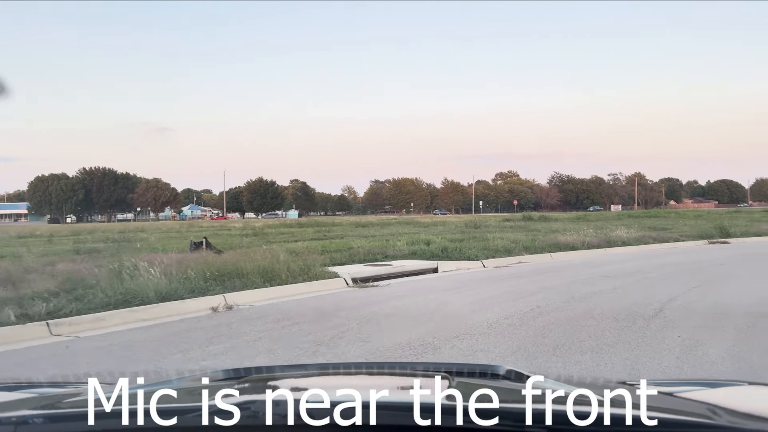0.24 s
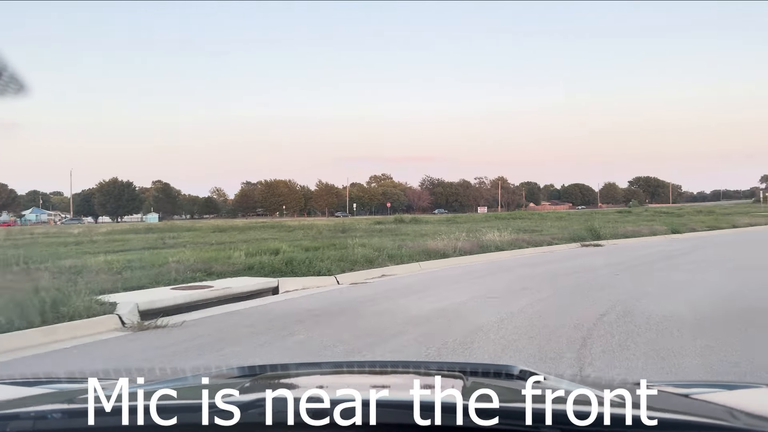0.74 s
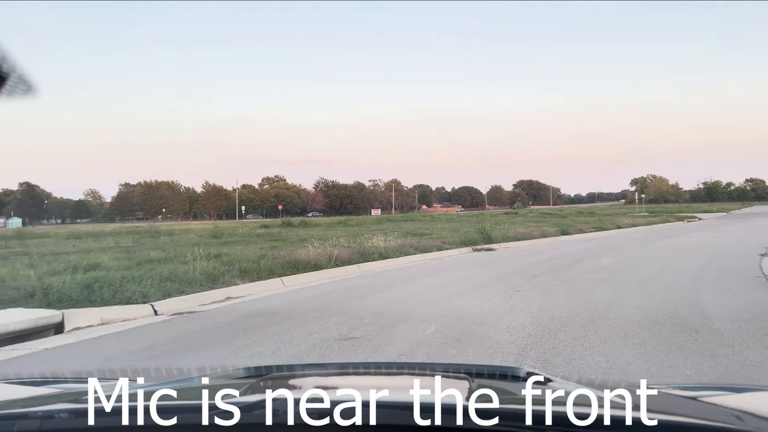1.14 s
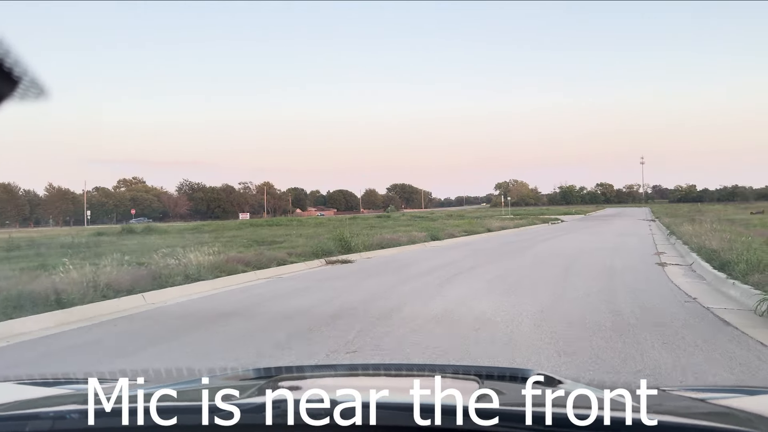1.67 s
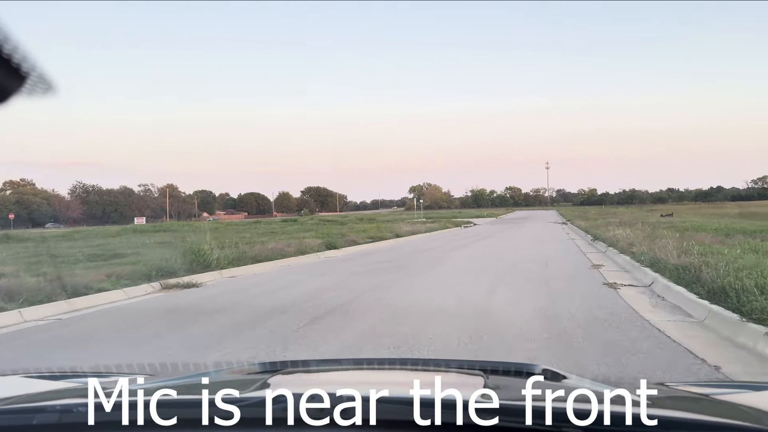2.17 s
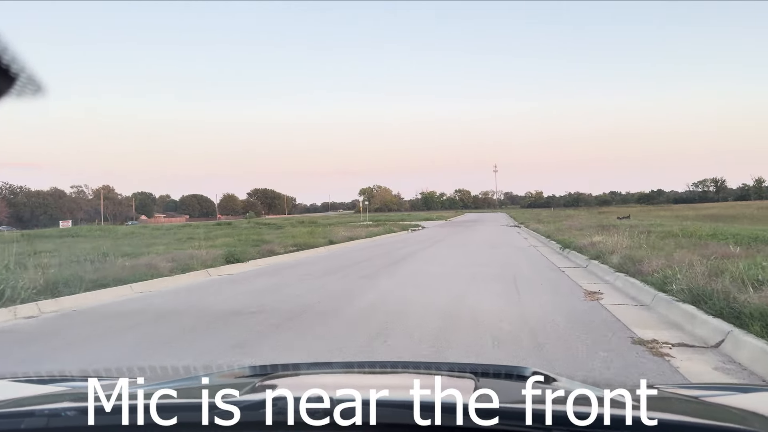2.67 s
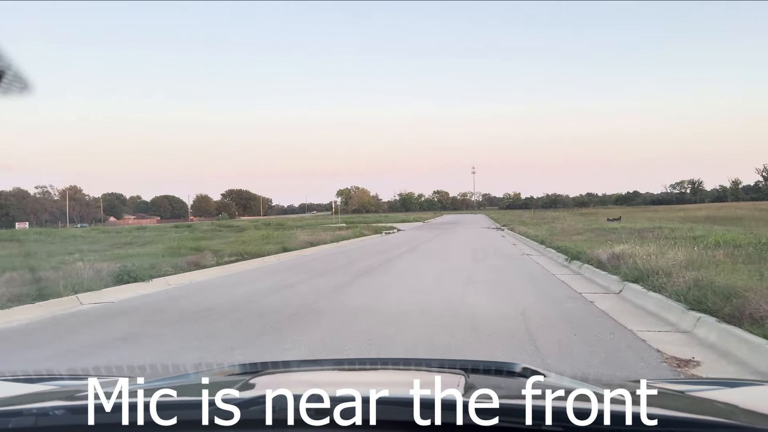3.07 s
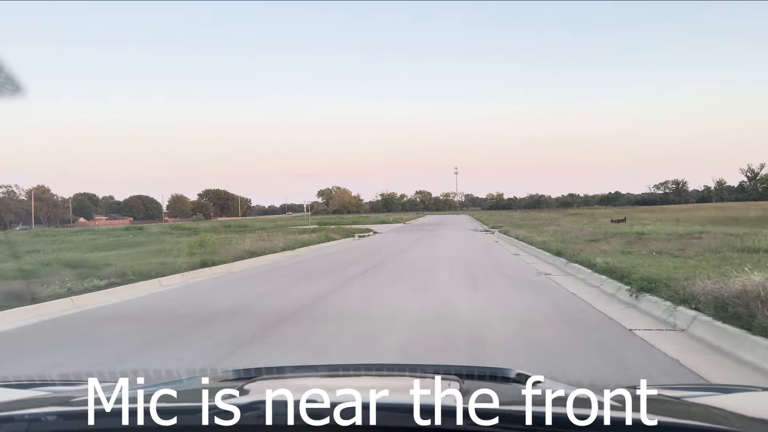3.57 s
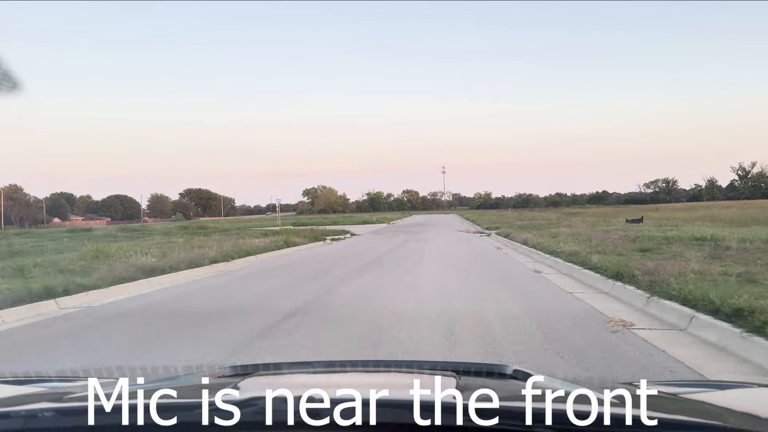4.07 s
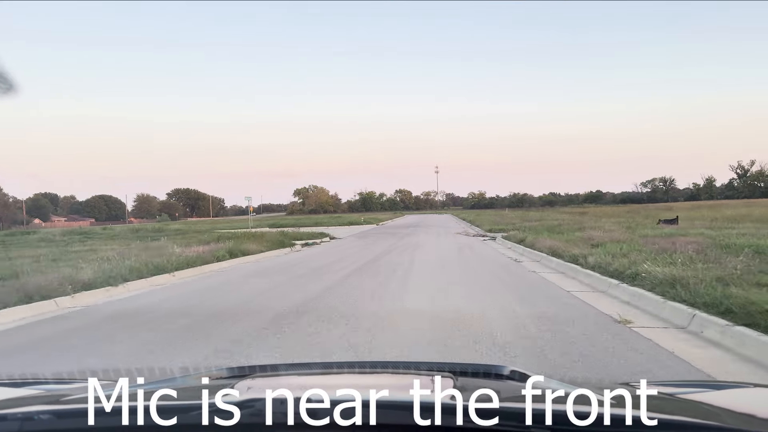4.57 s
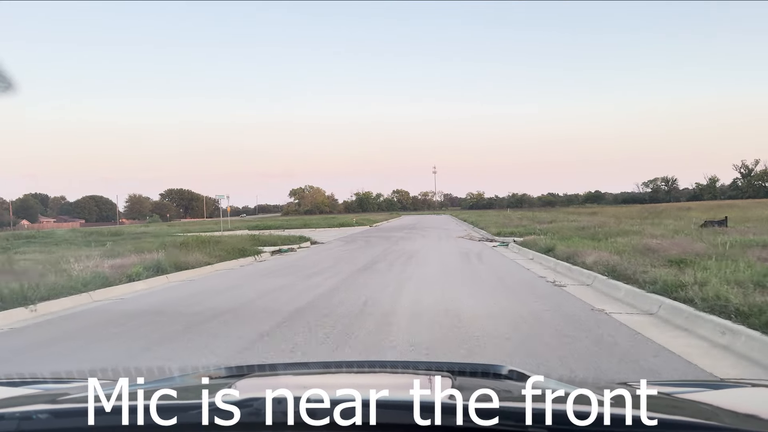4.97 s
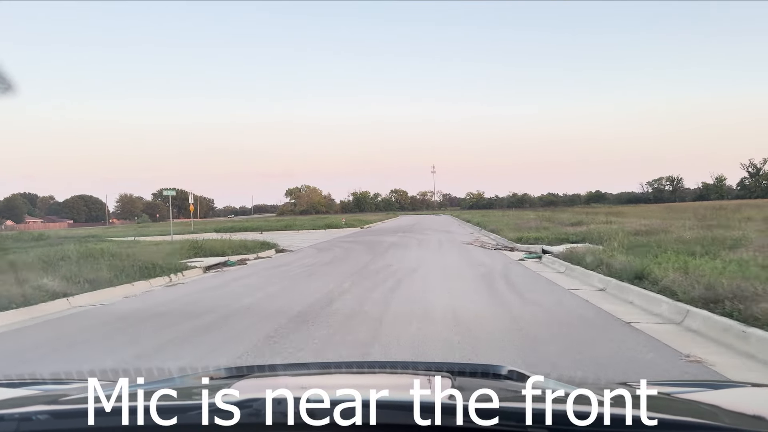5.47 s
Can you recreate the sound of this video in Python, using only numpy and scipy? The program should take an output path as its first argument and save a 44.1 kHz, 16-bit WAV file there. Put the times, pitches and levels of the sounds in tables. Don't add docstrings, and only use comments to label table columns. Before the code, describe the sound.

A car accelerates on a quiet road, heard from a microphone near the front. The low buzzing drone climbs and grows louder and rougher, then drops away into about ten chuffing turbo flutters with uneven exhaust stumbles. A short metallic clack marks the shift, the note dips, and the boom returns, rising with intake hiss to the end. Dry, close mono sound with distorted bass.

```python
import sys
import numpy as np
from scipy import signal
from scipy.fft import rfft, irfft
from scipy.io import wavfile

SR = 44100
rng = np.random.default_rng(int(sys.argv[2]) if len(sys.argv) > 2 else 0)


def unload_audio(sound):
    columns = np.transpose(np.atleast_2d(sound))
    steps = np.round(np.clip(columns, -1, 1) * 32767)
    wavfile.write(sys.argv[1], SR, steps.astype(np.int16))


def attenuation_scalar(level_db):
    decades = np.asarray(level_db, float) / 20
    return 10 ** decades


N = 252693
T = np.arange(N) / SR

PULSE_LAG = [0, -2.2, 2.9, 1.0, -1.5]
# f/Hz, width/Hz, lift/dB
PANEL_RINGS = [(458, 9.8, 0.5), (926, 340, 3), (1320, 11, 5), (1713, 80, 6.5), (2000, 78, -4),
               (2214, 100, 4), (2274, 32, 5), (2552, 100, 9), (2870, 27, 6), (3170, 22, 9.5),
               (3480, 52, 6.5), (3620, 10, -8), (4300, 220, 5), (4750, 190, 3.5), (4760, 99, 5),
               (4930, 160, -23), (5570, 68, 6), (5420, 80, -19), (5700, 80, 8), (6650, 200, 8.5),
               (7510, 150, 9), (7910, 120, 5), (8100, 60, -3), (8830, 87, 9), (9800, 60, 6.5),
               (11070, 150, 1.5), (11540, 100, 4.5), (12500, 80, -5), (14650, 220, 8)]
# f/Hz, width/Hz, lift/dB
DUCT_WHISTLES = [(3700, 49, 15), (3840, 250, 7), (4700, 35, 5.2), (5183, 42, 7.4), (6300, 86, 6),
                 (6760, 110, 5.7), (1775, 28, 8.3), (2450, 136.4, 4.1)]
LIFT_S, PRESS_S = 3.46, 4.49


def evened(x):
    return x / np.sqrt(np.mean(x ** 2) + 1e-20)


def read(points, hz):
    f, value = np.transpose(points)
    return np.interp(np.log(hz + 1), np.log(f + 1), value)


def columns(rows):
    s, *rest = np.transpose(rows)
    return [np.interp(T, s, c) for c in rest]


def drift(rate_hz):
    lowpass = signal.butter(2, rate_hz, fs=SR, output="sos")
    return evened(signal.sosfilt(lowpass, rng.standard_normal(N)))


def ramp(s, length):
    return np.sin(np.pi / 2 * np.clip((T - s) / length, 0, 1)) ** 2


def coloured(x, points, lo_hz, hi_hz, rings=()):
    hz = np.fft.rfftfreq(len(x), 1 / SR)
    lift_db = sum(db / (1 + (2 * (hz - f) / w) ** 2) for f, w, db in rings)
    z = rfft(x) * attenuation_scalar(read(points, hz) + lift_db)
    inside = (hz > lo_hz) & (hz < hi_hz)
    return irfft(z, len(x)) * len(x) / np.sqrt(2 * np.sum(abs(z[inside]) ** 2))


def add(mix, s, sound):
    part = mix[round(s * SR):][:len(sound)]
    part += sound[:len(part)]


def road(db):
    # f/Hz, spectral level/dB
    rumble_colour = [(4, 13.5), (12, 9.5), (30, 0.5), (55, -8.5), (130, -3), (250, -1.5), (330, -18.5),
                     (700, -16.5), (1500, -85), (3000, -110)]
    lumps_db = 1.6 * drift(8)
    return attenuation_scalar(db + 4.0 + lumps_db) * coloured(rng.standard_normal(N), rumble_colour, 19.8, 53.0)


def intake(turns, db, idle_db=-53):
    # f/Hz, spectral level/dB
    rush_colour = [(1500, -63), (3000, -50), (3900, 4.5), (5000, 10), (5700, -1), (6800, 0.5), (8500, -4),
                   (12000, -70), (15700, -41)]
    power = np.maximum(attenuation_scalar(2 * db) - attenuation_scalar(2 * idle_db), 0)
    breath = 1 + 0.27 * np.cos(4 * np.pi * turns + 2.05) + 0.087 * drift(60)
    rush = coloured(rng.standard_normal(N), rush_colour, 3500, 6700, DUCT_WHISTLES)
    return np.sqrt(power) * breath * rush


def clatter(turns, db):
    # f/Hz, spectral level/dB
    metal_colour = [(250, 3.5), (400, -8.5), (500, -11.5), (700, -23.5), (950, -13), (1700, -16.5),
                    (3700, -18), (4800, -19), (5600, -27), (9300, -31), (11600, -32), (12600, -33.5),
                    (13300, -39), (15700, -51)]
    # low f/Hz, high f/Hz, phase/cycle, flare depth, extra on every second firing
    parts = [(250, 1400, .3, 1.6, .3), (1400, 3300, 0, 1.9, .2), (3300, 5600, .85, 1.7, .1),
             (5600, 10300, .9, .8, .1), (10300, 12800, .1, 1.3, .5), (12800, 17000, .1, .4, .1)]
    noise = coloured(rng.standard_normal(N), metal_colour, 1180, 3410, PANEL_RINGS)
    out = 0
    for lo_hz, hi_hz, place, depth, extra in parts:
        firing, since = np.divmod(turns - place + 1, 1)
        size = attenuation_scalar(0.28 * rng.standard_normal(1000))[firing.astype(int)]
        size = size * (1 + extra * (-1) ** firing)
        flare = evened(1 + depth * size * 4 * since * np.exp(1 - 4 * since))
        band = signal.butter(3, [lo_hz, hi_hz], "band", fs=SR, output="sos")
        out = out + flare * signal.sosfiltfilt(band, noise)
    return attenuation_scalar(db - 1.6) * out


def thumps():
    # t/s, peak level/dB, f/Hz
    late_burns = [(3.554, -17, 154), (3.581, -17, 117.3), (3.57, -21, 62), (3.632, -21, 68),
                  (3.669, -14.5, 118.5), (3.701, -22, 61.6), (3.738, -18, 178), (3.802, -23.5, 130),
                  (3.8, -23, 30), (3.98, -29, 35), (4.15, -37, 60.3), (4.21, -37, 137), (4.249, -25, 121),
                  (4.42, -35, 95.1), (4.45, -34, 50)]
    out, t = np.zeros(N), T[:SR // 10]
    for s, db, hz in late_burns:
        swell = (t / 0.022) * np.exp(1 - t / 0.013)
        add(out, s - .015, attenuation_scalar(db) * swell * np.sin(2 * np.pi * hz * t))
    return out


def clacks():
    # t/s, peak level/dB, ring f/Hz, brightness/dB
    strikes = [
        (0.5194, -40, 1650, -13),
        (4.4493, -24.5, 1610, -10),
        (4.7, -27, 1320, -19),
    ]
    modes = [(1, 0), (2.1, -7), (5.2, -17)]
    rattle_colour = [(800, -31), (2500, 11), (9000, -4), (15000, -20)]
    out, t = np.zeros(N), T[:SR // 10]
    for s, db, hz, bright_db in strikes:
        ring, *upper = (attenuation_scalar(d) * np.sin(2 * np.pi * k * hz * t) * np.exp(-t / 0.0026) for k, d in modes)
        rattle = coloured(rng.standard_normal(len(t)), rattle_colour, 800, 15000)
        tick_and_tail = 0.14 * np.exp(-t / 0.0024) + 0.17 * np.exp(-t / 0.036)
        bright = sum(upper) + rattle * tick_and_tail
        onset = np.minimum(t / 0.00081, 1)
        add(out, s, attenuation_scalar(db) * (ring + attenuation_scalar(bright_db + 7) * bright) * onset)
    return out


def flutter():
    # t/s, peak level/dB, duct ring f/Hz
    surges = [(3.462, -19, 1022), (3.539, -21, 1075), (3.622, -19.5, 1152), (3.694, -23, 1078),
              (3.772, -24.5, 1002), (3.858, -25.5, 1153), (3.937, -27.5, 1055), (4.015, -28.5, 1032),
              (4.09, -34, 1020), (4.169, -41, 1014)]
    # f/Hz, spectral level/dB
    surge_colour = [(290, -36), (500, -1), (722, -44), (784, 1.5), (1160, 0), (1550, -12), (1830, -11.5),
                    (1930, -53), (2500, -25), (3100, -35), (3860, -22), (6490, -25.5), (12000, -45)]
    puff_s, lead_s = 0.066, .014
    hiss = coloured(rng.standard_normal(N), surge_colour, 700, 1200, DUCT_WHISTLES)
    out, t = np.zeros(N), T[:SR // 8]
    swell = np.sin(np.pi * np.minimum(t / puff_s, 1) ** .75) ** 1.2 + .25 * np.sin(np.pi * t / t[-1])
    for s, db, hz in surges:
        climb_hz = hz * (.9 + .27 * np.tanh(t / 0.041))
        tone = np.exp(2j * np.pi * np.cumsum(climb_hz) / SR)
        noise = [1, 1j] @ rng.standard_normal((2, len(t)))
        breathy = signal.lfilter([1], [1, -np.exp(-np.pi * 55 / SR)], noise)
        breath = evened(abs(breathy)) * breathy / abs(breathy)
        ring = evened(((1 + .45 * breath) * tone).real)
        puff = 0.51 * ring + 0.72 * hiss[round(s * SR):][:len(t)]
        add(out, s - lead_s, attenuation_scalar(db - 11.5) * swell * puff)
    return out


def burble():
    start_s = 3.52
    roar_colour = [(35, -20), (60, -4), (130, 2.5), (250, -1.5), (350, -14.5), (900, -53)]
    roar = coloured(rng.standard_normal(N), roar_colour, 50, 300)
    fade_db = -31.5 - 14.5 * np.maximum(T - start_s, 0) + 3.8 * drift(12.6)
    return ramp(start_s, .03) * attenuation_scalar(fade_db) * roar


def rasp(turns, db):
    # f/Hz, level/dB
    bay_colour = [(100, 2), (300, -3), (400, -17.5), (470, 1.5), (540, -3), (700, -15.5), (800, -9),
                  (950, -3.5), (1300, -11.5), (2000, -16), (3500, -110)]
    shaky = turns + .005 * drift(20)
    lags = PULSE_LAG[-1] + 1.2 * np.arange(12) ** 1.5
    lines, halves = 0, 0
    for k, lag in enumerate(lags):
        lines = lines + attenuation_scalar(2.63 * drift(3.0) - 1.45 * k) * np.cos(2 * np.pi * (5 + k) * shaky + lag)
    for k in range(1, 12):
        phase = (k + .5) * shaky + rng.random()
        halves = halves + attenuation_scalar(5.4 * drift(6.8)) * np.cos(2 * np.pi * phase)
    roar = coloured(rng.standard_normal(N), [(300, -12), (650, -9), (900, 0), (SR, 0)], 300, 1600)
    drive = evened(lines + 0.52 * halves) + .5 * roar
    return attenuation_scalar(db - 3.0) * coloured(drive, bay_colour, 380, 680, PANEL_RINGS)


def orders(firing_hz, shut, boost):
    # f/Hz, level/dB
    order_1 = [(56, -36), (60, -35.5), (71, -35), (78, -26.5), (85, -26), (90, -24.5), (99, -20.5),
               (107, -19.5)]
    order_2 = [(112, -29), (132, -29), (143, -26.5), (149, -22.5), (165, -22.5), (176, -27.5), (196, -32.5),
               (214, -21.5)]
    order_3 = [(168, -30), (188, -24.5), (206, -32.5), (222, -36), (247, -39.5), (268, -36.5), (306, -50),
               (321, -30.5)]
    order_4 = [(224, -41), (239, -45.5), (251, -37.5), (287, -49.5), (300, -44), (340, -57), (408, -49.5),
               (428, -30.5)]
    coasting_db = [-30.5, -30, -46, -72]
    boost_db = [5.9, 0.057, 4.5, 0.12]
    # start t/s, length t/s, order 1 change/dB, higher orders change/dB
    misfires = [(3.53, .12, -5, 3), (3.65, .2, -7, -13), (3.955, .025, -7, -7), (4.045, .03, -7, -3),
                (4.2, .03, -8, -10), (4.25, .025, -8, -14), (4.305, .025, -9, -16), (4.375, .03, -12, -2),
                (4.435, .06, -5, -6), (4.92, .17, -4, 1)]
    responses = [order_1, order_2, order_3, order_4]
    loaded = np.array([read(p, k * firing_hz) for k, p in enumerate(responses, 1)])
    loaded = loaded + np.outer(boost_db, boost - .3)
    stumble = 0
    for s, length, first_db, higher_db in misfires:
        dip = ramp(s - .008, 0.011) - ramp(s + length - .008, 0.019)
        stumble = stumble + dip * np.array([[first_db], [higher_db], [higher_db], [higher_db]])
    bite = -12 * (ramp(PRESS_S - .02, 0.031) - ramp(PRESS_S + 0.04, .07))
    bite = bite * np.array([[1], [0], [0], [0]])
    return loaded + shut * (np.array(coasting_db)[:, None] - loaded) + stumble + bite


def boom(turns, firing_hz, orders_db, uneven):
    out = 0
    rounding = 1.7 * np.clip((85 - firing_hz) / 15, 0, 1)
    for k, (db, lag) in enumerate(zip(orders_db, PULSE_LAG), 1):
        shake = uneven * 0.66 * k ** .5 * (drift(34) + 1j * 0.97 * drift(34))
        phase = 2 * np.pi * k * turns + lag + (k == 2) * rounding
        out = out + attenuation_scalar(db + 4.0) * ((1 + shake) * np.exp(1j * phase)).real
    return out


def scene():
    # t/s, firing f/Hz, boost 0-1
    driving = [(0, 55.58, 0.13), (.5, 61.25, 0.21), (1.05, 65.98, 0.19), (1.7, 72.82, 0.2),
               (2.27, 82.04, 0.27), (2.75, 92.24, 0.48), (3.1, 101.7, 0.61), (3.35, 106.8, 0.78),
               (3.47, 104.9, 0.58), (3.63, 106.9, 0.2), (3.87, 99.84, 0.05), (4.25, 92.33, 0.13),
               (4.41, 89, 0.21), (4.535, 77.6, 0.25), (4.65, 81.7, .18), (4.92, 84.6, 0.28),
               (5.07, 84.5, .38), (5.73, 95.5, 0.99)]
    # firing f/Hz, level/dB
    rasp_by_speed = [(57, -53), (62.5, -43.5), (65, -45), (71, -48.5), (78, -43), (92, -38.5), (101, -36.5),
                     (107, -29.5)]
    firing_hz, boost = columns(driving)
    firing_hz = firing_hz + .25 * drift(5.85)
    turns = 0.2576 + np.cumsum(firing_hz) / SR
    open_s = .07
    shut = ramp(LIFT_S, .11) - ramp(PRESS_S, open_s)
    eased = ramp(LIFT_S, 0.24) - ramp(PRESS_S, open_s)
    uneven = np.clip(0.038 + shut * (0.071 - 0.038), 0, 1)

    road_db = -55 + 2 * T - 2 * shut
    intake_db = -54 + 14.5 * boost
    clatter_db = -50.5 + 0.2026 * np.maximum(firing_hz - 65.1, 0) + 1 * boost - 2.5 * shut
    rasp_db = (1 - eased) * read(rasp_by_speed, firing_hz) + eased * -45
    orders_db = orders(firing_hz, shut, boost)

    mix = road(road_db) + intake(turns, intake_db) + clatter(turns, clatter_db)
    mix = mix + thumps() + clacks() + flutter() + burble()
    mix = mix + rasp(turns, rasp_db) + boom(turns, firing_hz, orders_db, uneven)
    return mix[None]


def treble_grain(heard):
    hz, _, z = signal.stft(heard, SR, nperseg=1024, boundary="odd", padded=False)
    grain = abs(z) * np.exp(2j * np.pi * rng.random(z.shape)) * (hz > 1800)[:, None]
    grain = signal.istft(grain, SR, nperseg=1024)[1]
    return attenuation_scalar(-9) * np.pad(grain, ((0, 0), (0, 1024)))[:, :N]


def top_cut(x):
    return signal.sosfilt(signal.butter(12, 15750, fs=SR, output="sos"), x)


def record(dry):
    rail, low_cut_hz = .167, 40
    pole = np.exp(-2 * np.pi * low_cut_hz / SR)
    heard = signal.lfilter([1, -1], [1, -pole], np.clip(dry, -rail, rail))
    heard = heard + treble_grain(heard)
    return top_cut(heard)


dry = scene()
out = record(dry)
unload_audio(out)
```